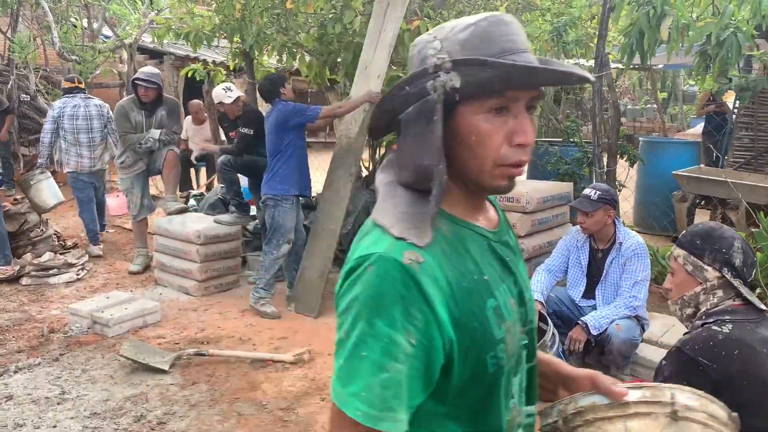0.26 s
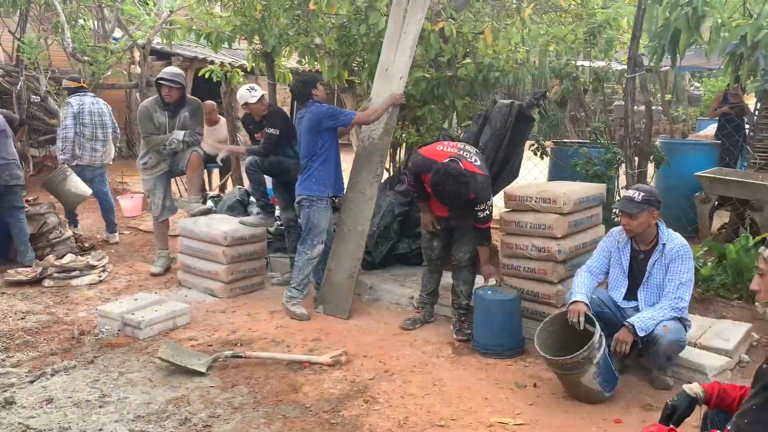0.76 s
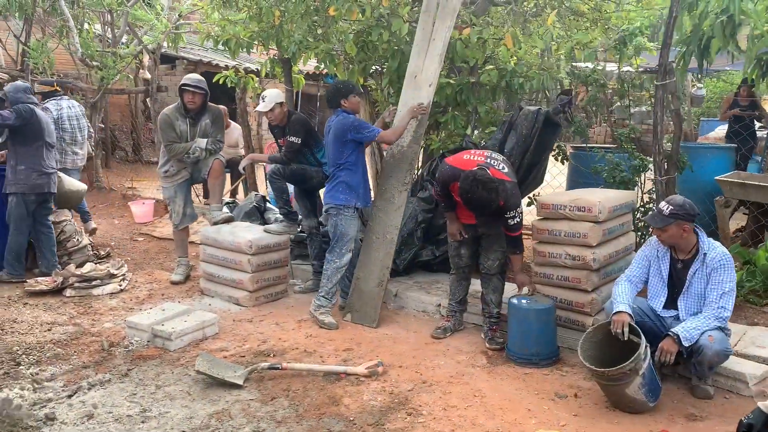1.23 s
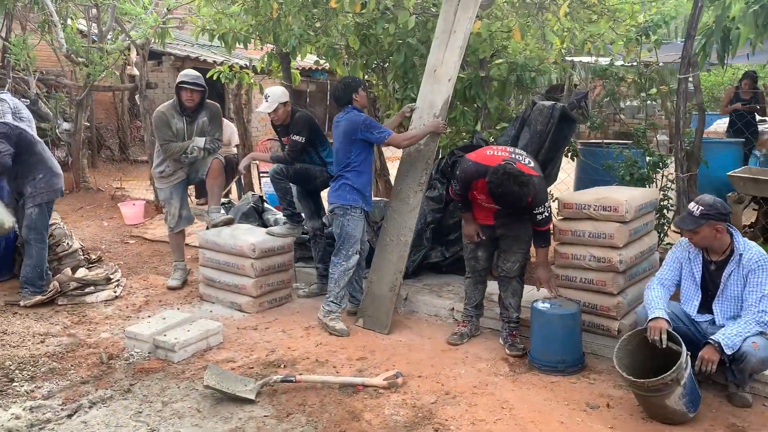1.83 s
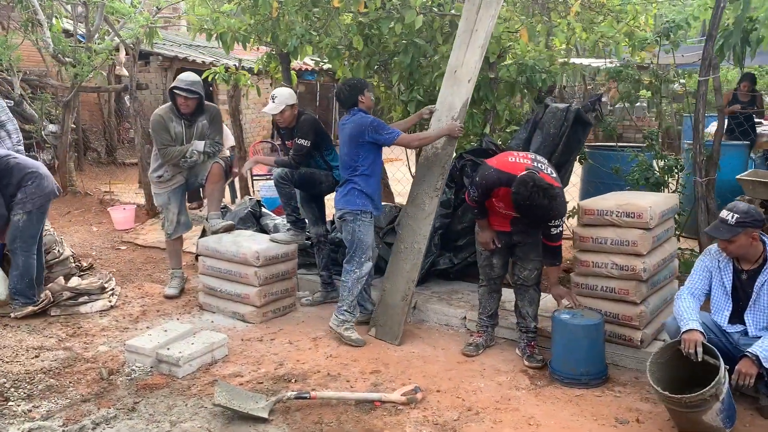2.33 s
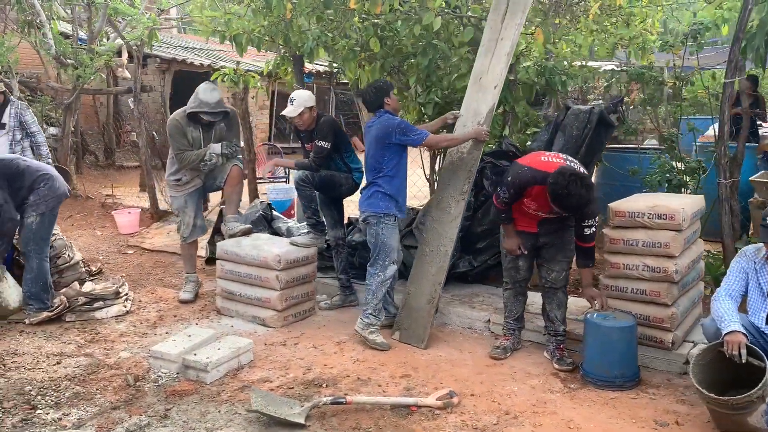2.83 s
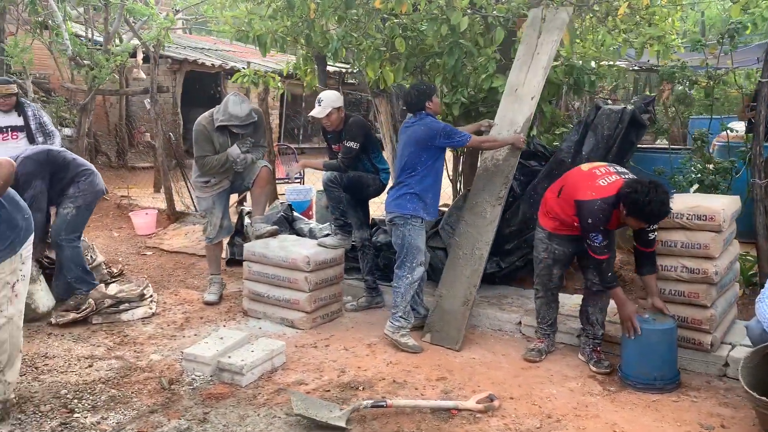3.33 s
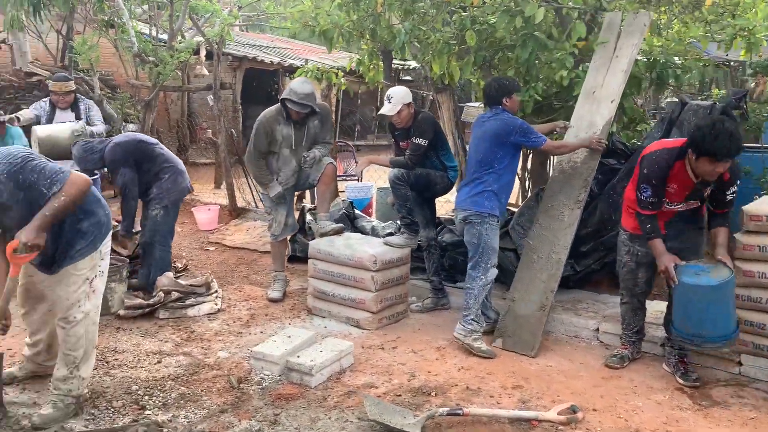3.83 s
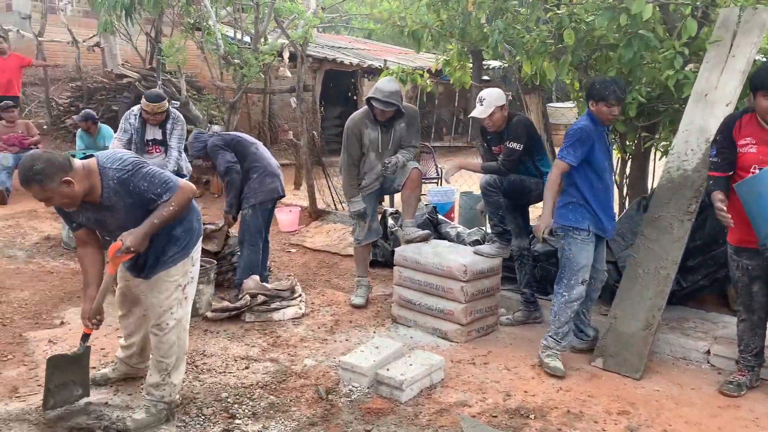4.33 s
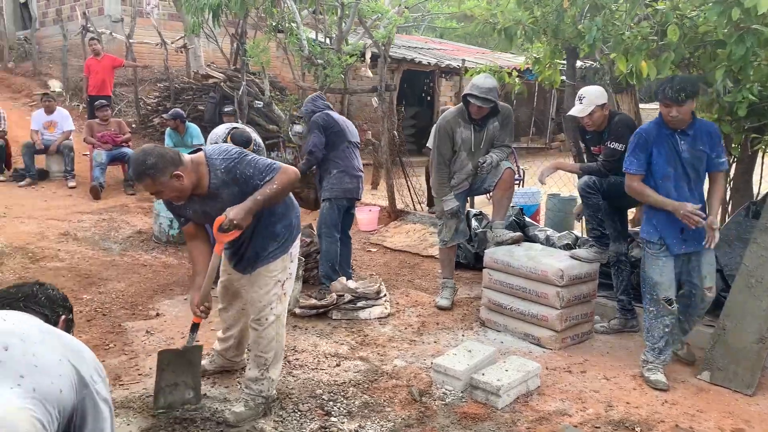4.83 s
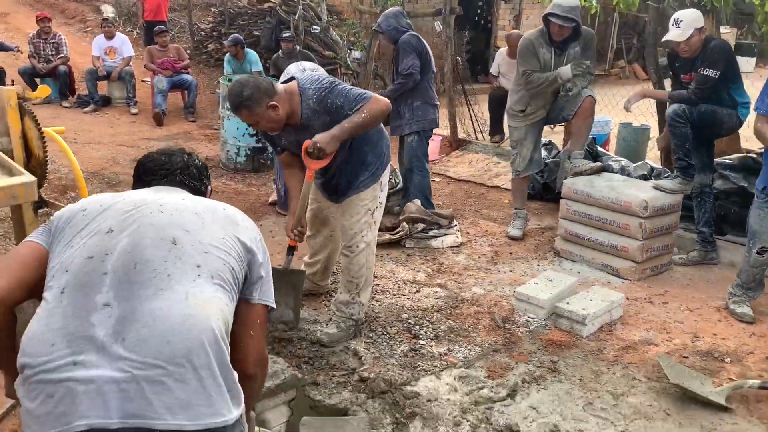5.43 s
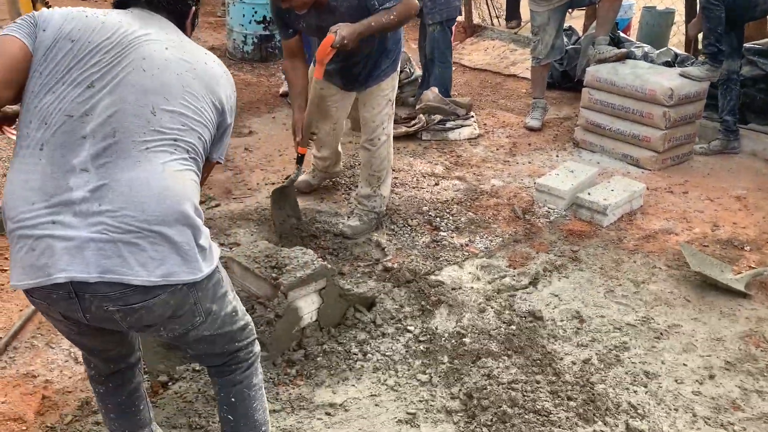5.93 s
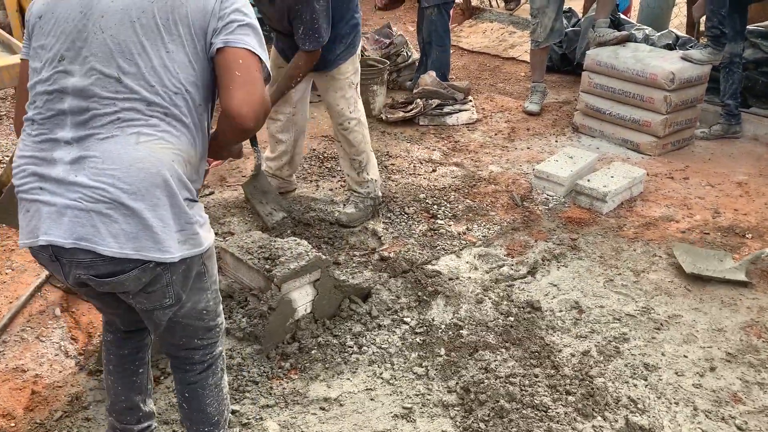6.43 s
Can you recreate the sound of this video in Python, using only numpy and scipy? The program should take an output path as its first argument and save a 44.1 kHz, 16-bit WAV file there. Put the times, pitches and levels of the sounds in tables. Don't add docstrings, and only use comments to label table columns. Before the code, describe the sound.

Shovel blades scrape and chop gritty wet concrete, stones clicking sharply against steel, while a small mixer engine drones steadily on the left outdoors.

```python
import sys
import numpy as np
from scipy import signal
from scipy.fft import rfft, irfft, next_fast_len
from scipy.io import wavfile
from scipy.ndimage import uniform_filter1d, minimum_filter1d, map_coordinates

SR = 44100
rng = np.random.default_rng(int(sys.argv[2]) if len(sys.argv) > 2 else 0)


def volts_from_decibels(level):
    exponent = np.asarray(level, float) / 20
    return 10 ** exponent


def master_out(mix):
    frames = np.transpose(np.atleast_2d(mix))
    ceiling = np.clip(frames, -1, 1)
    pcm = np.round(ceiling * 32767).astype(np.int16)
    wavfile.write(sys.argv[1], SR, pcm)


N = 293706

# frequency in Hz, phase in turns.
PORT_PHASE = [(5100, -.46), (5600, -.6), (6400, -.8), (6900, -.8), (7500, -.6), (7990, -.6)]
MONO_HZ, SPLIT_HZ, TOP_HZ = 1300, 7990, 15760
ALIGN_HZ, TURN_HZ = 10950, 4950

# time in seconds, level in dB.
ENGINE_LOAD = [(0, -39.5), (.55, -40), (.9, -39), (1.2, -40), (1.4, -39), (1.55, -36.5), (1.72, -40),
               (1.88, -37.5), (2.15, -39.5), (3.1, -40), (3.38, -38), (3.65, -39.5), (4.15, -38.5),
               (4.3, -39.5), (5.0, -37.5), (5.18, -35), (5.35, -38.5), (6.66, -38)]
# centre in Hz, width in Hz, level in dB.
EXHAUST_MODES = [(66.4, 37, -6), (96.2, 60, -2.5), (128.3, 35.4, -1), (195.4, 83, -11), (226, 41.2, -3.5),
                 (256.3, 34.5, -11.5)]
# centre in Hz, width in Hz, level in dB.
CASING_MODES = [(512, 86, 2.5), (592, 85, 2), (657, 38, 0.5), (796, 39, -1.5), (978, 68, 2.5),
                (1083, 54.5, 3), (1156, 79, -1.5), (1696, 190, -14.5), (2121, 83, -10.5)]
# frequency in Hz, density in dB per Hz.
DRUM_SPECTRUM = [(30, -32), (60, -1.5), (350, 1.5), (1200, -5), (1500, -13), (2200, -61)]
# frequency in Hz, density in dB per Hz.
HISS_SPECTRUM = [(900, -16), (1500, 0.5), (2300, 0), (3000, -5), (5000, -13), (7900, -17), (8100, -38)]
# start in seconds, length in seconds, bite level in dB, lift level in dB.
FAR_SCRAPES = [
    (.7, 0.42, -52, -52),
    (1.4, .6, -45, -49.5),
    (2.4, 0.25, -56, -51.5),
    (3.2, 0.4, -43, -52),
    (4.05, .35, -51, -55),
    (4.75, 0.29, -44, -54.5),
    (5.25, 0.69, -54.5, -52.5),
    (6.0, 0.077, -41, -55),
    (6.58, 0.044, -67, -50),
]
EXHAUST_DB, CASING_DB, HISS_DB = -2, -4, -21
HISS_DIP_DB = -50
ENGINE_LAG_MS = 0.4

# time in seconds, right port lag in ms.
SHOVEL_LAG = [(.5, .31), (1.9, .3), (3.3, .28), (3.46, .19), (3.56, .19), (3.65, .27), (3.75, .27),
              (3.8, .21), (4.4, .2), (4.85, .165), (5.05, .092), (5.8, .092), (6.2, .16)]
# start in seconds, length in seconds, grit at the bite in dB,
# grit at the lift in dB, blade rasp in dB re grit.
SCRAPES = [(0, 0.12, -36.5, -49, -16), (.125, 0.15, -35, -58, -18.5), (0.393, 0.063, -31.5, -34, -16),
           (0.462, 0.088, -29, -34, -16.5), (0.812, 0.055, -38, -48, -5), (1.466, 0.22, -45, -55, -2.5),
           (1.796, .05, -41.5, -41, -5), (1.863, 0.067, -34.5, -31, -8.5), (1.96, .04, -44, -42, -15),
           (1.999, 0.018, -28.5, -30.5, -9), (2.042, 0.019, -27.5, -28.5, -13.5),
           (2.18, 0.04, -36, -31, -15), (2.244, 0.14, -38, -39.5, -11), (2.41, .04, -47, -36, -9.5),
           (2.938, 0.29, -35, -32.5, -14), (3.271, 0.25, -29.5, -26, -11), (4.697, .025, -28.5, -26, -17.5),
           (4.732, .075, -26.5, -27.5, -11), (4.803, .11, -38.5, -41.5, -9),
           (5.174, 0.12, -32.5, -43, -4.5), (5.788, 0.11, -36, -57, -19), (6.122, 0.1, -39, -46, -27)]
# start in seconds, length in seconds, grit at the bite in dB,
# grit at the lift in dB, blade rasp in dB re grit.
CHOPS = [
    (3.655, 0.072, -40, -32, -15.5),
    (3.766, 0.034, -32.5, -26.5, -16),
    (3.8, 0.015, -25, -21, -19.5),
    (3.84, 0.026, -34, -26, -15),
    (4.475, .04, -37, -30, -41),
    (4.53, 0.19, -34.5, -33, -33),
    (5.087, 0.047, -27, -35, -17),
    (5.674, 0.07, -41, -36, -24),
]
# time in seconds, level in dB.
TRICKLE = [(0, -50), (2.9, -50.5), (3.95, -41.5), (4.25, -48.5), (5.1, -50), (5.6, -47.5), (6.66, -47)]
# time in seconds, peak in dB, rasp in dB re peak.
STONES = [(.3965, -11, -41), (0.4783, -10, -29.5), (1.8742, -16, -25), (1.9008, -11, -30),
          (2.004, -11, -30), (2.192, -14.5, -27), (2.227, -13, -34), (2.349, -14, -26), (2.9884, -9.5, -39),
          (3.0833, -9.5, -30), (3.2085, -13, -27), (3.2866, -9, -22), (3.3837, -8, -34),
          (3.4986, -4.5, -42), (3.763, -8, -36), (3.7993, -11, -45), (3.8217, 11.5, -53),
          (4.4757, -13.5, -42), (4.5081, -0.5, -55), (4.568, -4, -42), (4.613, -5.5, -43),
          (4.7067, -5.5, -33), (4.759, -2.5, -40), (4.904, -7.5, -24), (5.0873, -13, -34),
          (5.1395, -6, -31), (5.1055, -7, -35), (5.673, -7.5, -38), (5.7413, -10.5, -29.5),
          (5.7561, -2, -38)]
# time in seconds, peak in dB.
PEBBLES = [(0.129, -24), (0.427, -16), (.823, -21), (1.4745, -21), (1.5333, -24), (1.802, -30),
           (2.111, -20.5), (2.2777, -23), (2.4433, -16.5), (2.9432, -30), (3.2615, -16), (3.3328, -22),
           (3.3648, -17), (3.677, -17.5), (3.7276, -19), (3.8707, -13), (3.9644, -19.5), (4.11, -27),
           (4.1823, -28), (4.342, -24.5), (4.4322, -22.5), (4.556, -16), (4.6565, -16.5), (5.1793, -16.5),
           (5.228, -19), (5.5333, -32), (5.7006, -18.5), (5.7902, -28), (6.1285, -28), (6.4612, -29)]
# time in seconds, peak in dB, t60 in seconds.
EDGE_KNOCKS = [(1.973, -38, 0.023), (2.0023, -43, 0.037), (2.1924, -48, 0.032), (2.5326, -47, 0.03),
               (3.079, -35.5, 0.024), (3.1462, -34, 0.017), (3.1723, -30.5, 0.018), (3.2595, -33, 0.03),
               (3.7638, -54, 0.03), (3.799, -47, 0.046), (4.422, -45, 0.016), (4.6244, -37, 0.035),
               (4.7084, -36, 0.051), (4.757, -33, 0.045), (4.9048, -47, 0.022), (5.089, -40, 0.03),
               (5.127, -31, 0.022), (5.1396, -41, 0.019), (5.1801, -43, 0.021), (5.673, -41, 0.019),
               (5.7578, -39, 0.053), (5.7994, -41, 0.021), (5.9516, -34, 0.017), (6.0172, -33, 0.015)]
# frequency in Hz, density in dB per Hz.
GRIT_SPECTRUM = [(7900, 0), (10500, 0), (13000, -2.5), (15000, -6), (16000, -7.5)]
# frequency in Hz, density in dB per Hz.
RASP_SPECTRUM = [(1200, -30), (2500, 0), (4000, -1.5), (5200, -4.5), (6500, -5), (7300, -5), (8000, -10)]
# centre in Hz, width in Hz, level in dB.
BLADE_MODES = [(1280, 83, 2.5), (1700, 97, 9.5), (1850, 330, 2.5), (2570, 1360, -5.5), (3480, 75, -79)]
BITE_S, LIFT_DB_PER_S = 0.0097, 309
SCRAPE_FINE_DB, CHOP_FINE_DB = 2.5, 0
SCRAPE_BODY_DB, CHOP_BODY_DB = -1, 0
TRICKLE_RASP_DB, TRICKLE_SWING_DB = -13, 2.5
STONE_T60_S, PEBBLE_T60_S, PEBBLE_RASP_DB = 0.0073, 0.014, -32

CEILING_DB, HOLD_S, RECOVER_DB_PER_S = -8.5, 0.062, 43


def unit(x):
    return x / np.sqrt(np.mean(x ** 2) + 1e-20)


def power_db(power):
    return 10 * np.log10(power)


def along(points, hz):
    f, v = np.transpose(points)
    return np.interp(np.log(hz + 1), np.log(f + 1), v)


def curves(rows):
    s, *cols = np.transpose(rows)
    return [np.interp(np.arange(N) / SR, s, c) for c in cols]


def wobble(rate_hz):
    return map_coordinates(rng.standard_normal(N // 20), [np.arange(N) * rate_hz / SR])


def filtered(x, response):
    m = next_fast_len(N + SR // 2)
    return irfft(rfft(x, m) * response(np.fft.rfftfreq(m, 1 / SR)), m)[..., :N]


def colour(spectrum):
    return lambda hz: volts_from_decibels(along(spectrum, hz))


def modes(table):
    def response(hz):
        total = 0
        for k, (centre, width, db) in enumerate(table):
            damping = 1j * hz * width
            total = total + (-1) ** k * volts_from_decibels(db) * damping / (centre ** 2 - hz ** 2 + damping)
        return total
    return response


def strokes(rows):
    start, length, bite_db, lift_db = np.transpose(rows)[:4, :, None]
    knots = np.arange(0, N + 32, 32)
    t = knots / SR - start
    run_db = bite_db + (lift_db - bite_db) * np.clip(t / length, 0, 1)
    run_db = run_db - LIFT_DB_PER_S * np.clip(t - length, 0, 1)
    power = (volts_from_decibels(run_db) * np.clip(t / BITE_S + 0.5, 0, 1)) ** 2
    return np.array([np.interp(np.arange(N), knots, row) for row in power])


def ports(x, lag_ms, scattered, diffuse_db):
    hz, t, (direct, stray) = signal.stft([x, scattered], SR, nperseg=512)
    hz = hz[:, None]
    wide = 1 / (1 + (MONO_HZ / (hz + 1)) ** 8)
    delay = -hz * np.interp(t, np.arange(N) / SR, lag_ms) / 1000 * wide
    turns = np.where(hz < PORT_PHASE[0][0], delay, along(PORT_PHASE, hz))
    turns = np.where(hz < SPLIT_HZ, turns, (hz - ALIGN_HZ) / TURN_HZ)
    half = np.exp(1j * np.pi * turns)
    stray = stray * wide * volts_from_decibels(np.where(hz < SPLIT_HZ, diffuse_db, -24))
    pair = [(direct + stray) / half, (direct - stray) * half]
    return signal.istft(pair, SR, nperseg=512)[1][:, :N]


def exhaust(turns):
    firing = unit(np.diff(np.floor(turns), prepend=0) * volts_from_decibels(2.9 * wobble(60)))
    return unit(filtered(0.62 * firing + rng.standard_normal(N), modes(EXHAUST_MODES)))


def casing(turns):
    puff = 1 + 0.22 * np.cos(2 * np.pi * turns)
    return unit(filtered(puff * rng.standard_normal((2, N)), modes(CASING_MODES)))


def drum():
    return unit(filtered(rng.standard_normal((2, N)), colour(DRUM_SPECTRUM))) * volts_from_decibels(2.64 * wobble(7.7))


def hiss(load_db):
    level_db = power_db(volts_from_decibels(load_db + HISS_DB) ** 2 + strokes(FAR_SCRAPES).sum(0)) + 2 * wobble(12)
    level_db = level_db - power_db(1 + strokes(CHOPS).sum(0) / volts_from_decibels(HISS_DIP_DB) ** 2)
    noise = unit(filtered(rng.standard_normal((2, N)), colour(HISS_SPECTRUM)))
    return volts_from_decibels(level_db - 3) * noise


def engine():
    load_db, = curves(ENGINE_LOAD)
    turns = np.cumsum(60 * (1 + 0.04 * wobble(3) + 0.1014 * wobble(50))) / SR
    pipe = volts_from_decibels(load_db + EXHAUST_DB + 0.9 * wobble(6) - 0.26) * exhaust(turns)
    upper = volts_from_decibels(load_db + CASING_DB) * (casing(turns) + volts_from_decibels(-2) * drum()) + hiss(load_db)
    return ports(pipe + upper[0], np.full(N, ENGINE_LAG_MS), upper[1], diffuse_db=-2.5)


def bursts(rows):
    out = np.zeros(N + SR)
    t = np.arange(SR // 10) / SR
    rise = 1 - np.exp(-t / 0.0006)
    for s, db, t60_s in rows:
        fall_db = -60 * t / max(t60_s, 0.002)
        crack, debris = volts_from_decibels(db + fall_db), volts_from_decibels(db - 11 + fall_db / 5)
        out[round(s * SR):][:len(t)] += (crack + debris) * rise
    return out[:N]


def stones():
    rows = [(s, db, rasp_db, STONE_T60_S) for s, db, rasp_db in STONES]
    rows += [(s, db, PEBBLE_RASP_DB, PEBBLE_T60_S) for s, db in PEBBLES]
    top = bursts([(s, db - 2, t60_s) for s, db, _, t60_s in rows])
    low = bursts([(s, db + rasp_db + 9, t60_s) for s, db, rasp_db, t60_s in rows])
    return top, low + volts_from_decibels(-1.5) * bursts(EDGE_KNOCKS)


def crunch(clump_db, spike_db):
    clumps = clump_db * wobble(60)
    spikes = spike_db * (0.52 * wobble(250) + wobble(1100))
    return unit(volts_from_decibels(clumps + spikes) * rng.standard_normal((2, N)))


def effort():
    trickle = volts_from_decibels(curves(TRICKLE)[0] + TRICKLE_SWING_DB * wobble(22)) ** 2
    scrape, chop = strokes(SCRAPES), strokes(CHOPS)
    sandy, coarse = scrape.sum(0) + trickle, chop.sum(0)
    grit = sandy + coarse
    rasp_sandy = volts_from_decibels(np.transpose(SCRAPES)[-1]) ** 2 @ scrape + volts_from_decibels(TRICKLE_RASP_DB) ** 2 * trickle
    rasp_coarse = volts_from_decibels(np.transpose(CHOPS)[-1]) ** 2 @ chop
    body = volts_from_decibels(SCRAPE_BODY_DB) ** 2 * rasp_sandy + volts_from_decibels(CHOP_BODY_DB) ** 2 * rasp_coarse
    fine_db = (SCRAPE_FINE_DB * sandy + CHOP_FINE_DB * coarse) / grit
    return power_db(grit), power_db(rasp_sandy + rasp_coarse), power_db(body), fine_db


def excited(x, response):
    gain = np.sqrt(np.mean(abs(response(np.fft.rfftfreq(SR, 1 / SR))) ** 2))
    return filtered(x, response) / gain


def shovels():
    grit_db, rasp_db, body_db, fine_db = effort()
    force = np.clip((grit_db + 58) / 26, 0.3, 1)
    grains = crunch(clump_db=1.7 * force, spike_db=3 * force)
    crack = crunch(clump_db=0, spike_db=-0.5)
    top, low = stones()

    def bright(hz):
        return colour(GRIT_SPECTRUM)(hz) * (hz >= SPLIT_HZ)

    def dull(hz):
        return colour(RASP_SPECTRUM)(hz) * (hz < SPLIT_HZ)

    grit = excited(volts_from_decibels(grit_db + 4) * grains + top * crack, bright)
    fine = filtered(grit, lambda hz: np.clip((hz - 8500) / 5000, 0, 1))
    grit = volts_from_decibels(fine_db) * fine + volts_from_decibels(-fine_db) * (grit - fine)
    rasp = excited(volts_from_decibels(rasp_db - 0.5) * grains + low * crack, dull)
    ring = excited(volts_from_decibels(body_db - 5.5) * grains + 1.07 * low * crack, modes(BLADE_MODES))
    both = grit + rasp + ring
    return ports(both[0], curves(SHOVEL_LAG)[0], both[1], diffuse_db=-10)


def scene():
    return engine() + shovels()


def levelled(x):
    loud_db = power_db(abs(uniform_filter1d(np.mean(x ** 2, 0), size=220)) + 1e-12)
    hold = round(HOLD_S * SR)
    need_db = np.minimum(CEILING_DB - loud_db, 0)
    need_db = minimum_filter1d(need_db, size=hold | 1, origin=hold // 2)
    climb_db = RECOVER_DB_PER_S * np.arange(N) / SR
    return x * volts_from_decibels(np.minimum.accumulate(need_db - climb_db) + climb_db)


def roll_off(x):
    return signal.sosfilt(signal.butter(12, 16830, fs=SR, output="sos"), x)


def record(dry):
    pair = levelled(filtered(dry, lambda hz: hz < TOP_HZ))
    mix = pair / (1 + abs(pair / 0.85) ** 6) ** (1 / 6)
    return roll_off(mix)


dry = scene()
out = record(dry)
master_out(out)
```